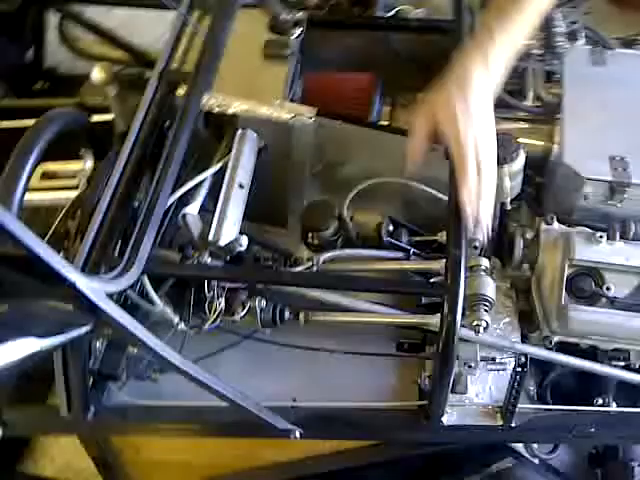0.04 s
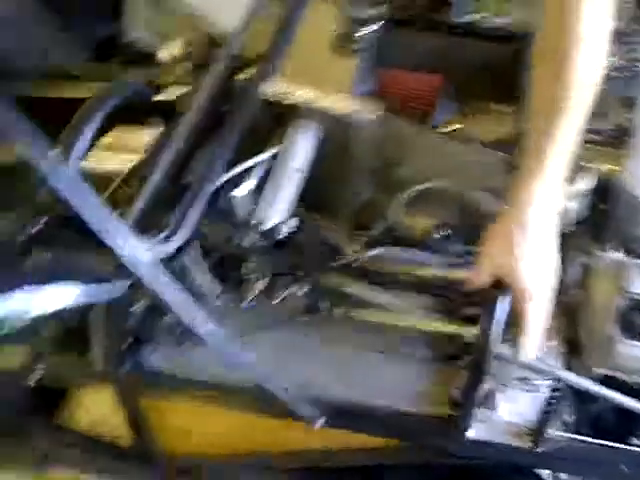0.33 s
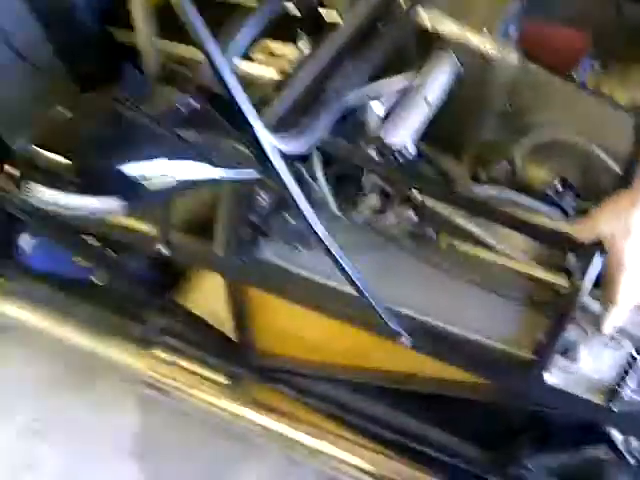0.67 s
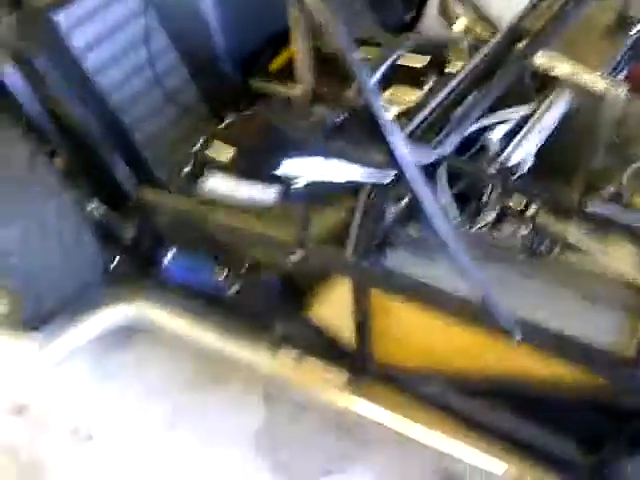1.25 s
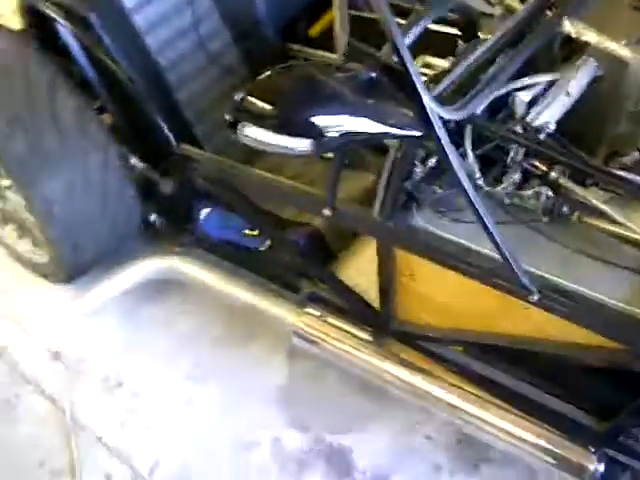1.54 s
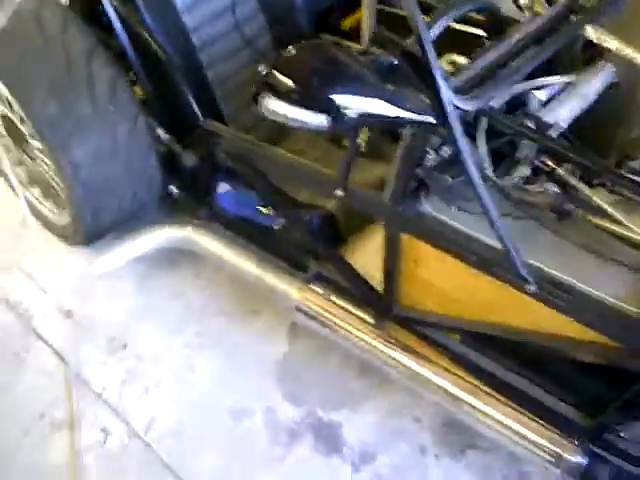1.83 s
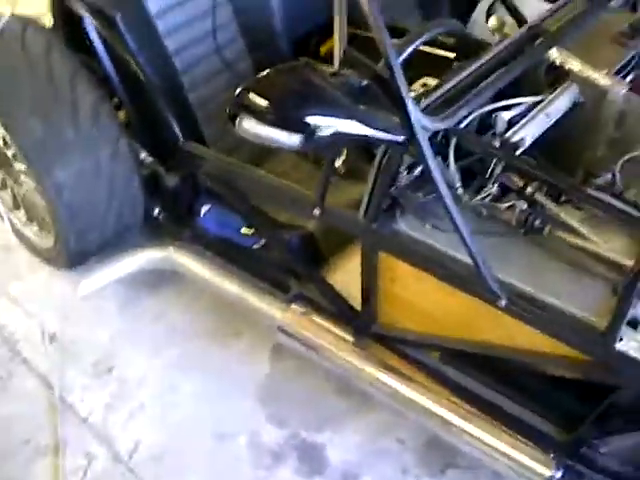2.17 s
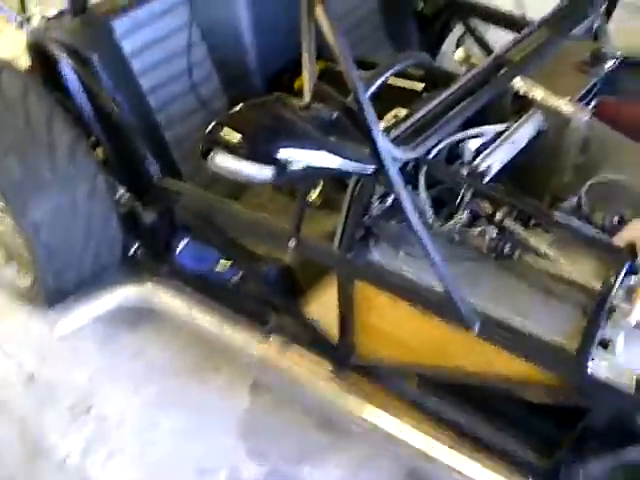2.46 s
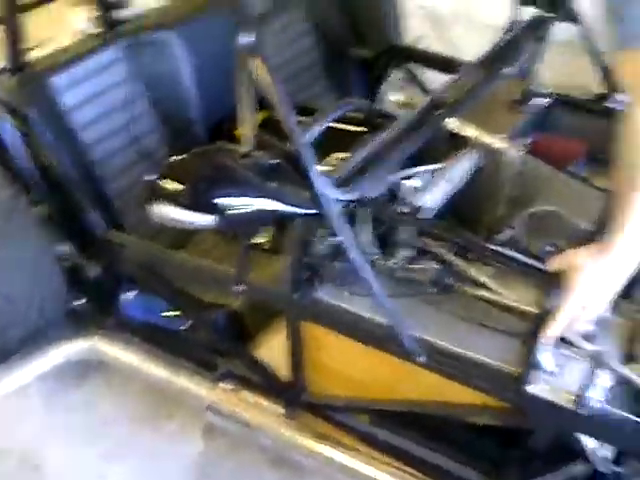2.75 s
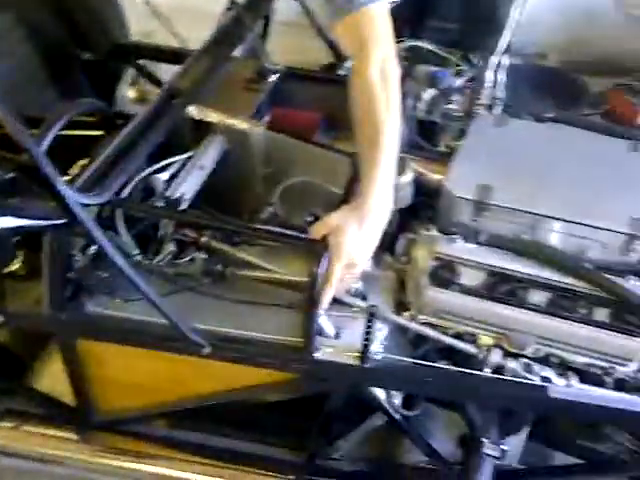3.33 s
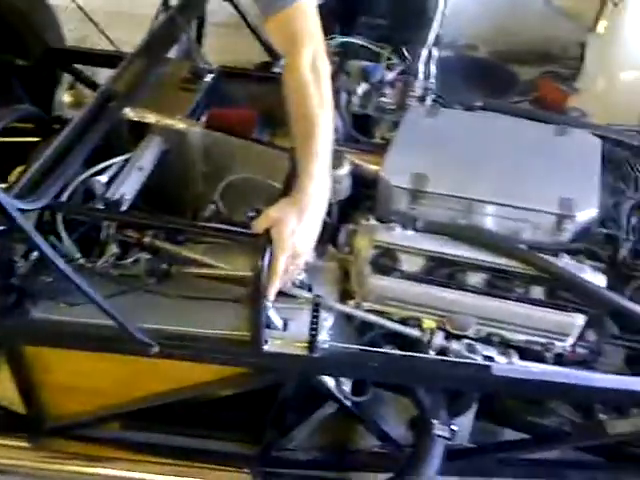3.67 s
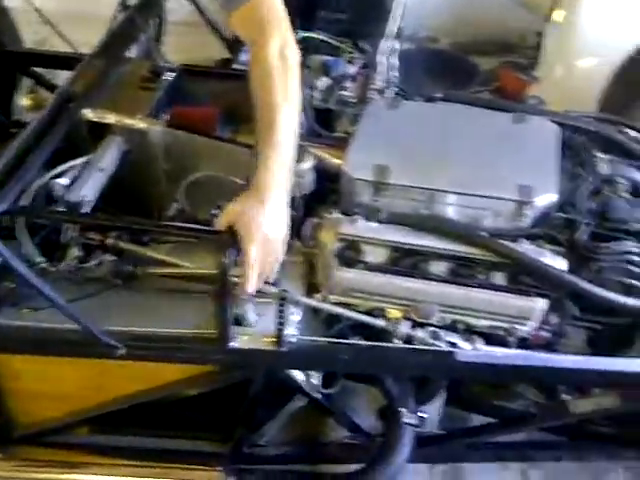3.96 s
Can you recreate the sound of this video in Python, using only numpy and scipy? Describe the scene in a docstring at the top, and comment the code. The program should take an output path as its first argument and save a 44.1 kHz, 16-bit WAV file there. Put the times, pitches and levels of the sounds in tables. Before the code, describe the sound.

An uncovered car engine sinks and surges on the throttle, booming, rasping and popping.

```python
"""In a garage, an uncovered four-cylinder engine runs while a hand works its throttle.
Each firing is a pressure pulse. As the revs sink, the uneven pulse train excites the exhaust's
resonances and booms; on the throttle it barks and rasps, with a few sharp pops of unburnt fuel.
Valve gear and belts tick and hiss underneath, and reflections from the close walls smear the pulses."""
import sys
import numpy as np
from scipy import signal
from scipy.fft import rfft, irfft
from scipy.io import wavfile
from scipy.ndimage import uniform_filter1d

SR = 44100
rng = np.random.default_rng(int(sys.argv[2]) if len(sys.argv) > 2 else 0)


def wav_out(sig):
    """Save sig, one row per channel (or a flat mono array), as 16-bit PCM at SR to the path in sys.argv[1]."""
    wavfile.write(sys.argv[1], SR, np.round(np.clip(np.atleast_2d(sig).T, -1, 1) * 32767).astype(np.int16))


N = 176400
TIME = np.arange(N) / SR


def from_db(db):
    """Amplitude ratio of a level: a factor of ten per 20 dB."""
    return 10 ** (np.asarray(db) / 20)


def rms_one(x):
    """Normalisation to unit mean power."""
    return x / np.sqrt(np.mean(x ** 2) + 1e-20)


def in_time(rows):
    """Linear interpolation of each column after the time column, at every sample."""
    times, *columns = np.transpose(rows)
    return [np.interp(TIME, times, column) for column in columns]


def evened(x, span_s):
    """Division by the running RMS: unit level over the span, while faster flutter stays."""
    size = max(int(span_s * SR), 2)
    power = uniform_filter1d(uniform_filter1d(x * x, size), size)
    return x / np.sqrt(np.abs(power) + 1e-12)


def coloured(x, spectrum, size=4096):
    """Minimum-phase filtering: folding the cepstrum gives the spectrum a causal response."""
    hz, db = np.transpose(spectrum)
    grid_hz = np.maximum(np.arange(size // 2 + 1) * SR / size, 1)
    gain = from_db(np.interp(np.log(grid_hz), np.log(hz), db))
    cepstrum = irfft(np.log(gain))
    cepstrum[1:size // 2] *= 2
    cepstrum[size // 2 + 1:] = 0
    response = irfft(np.exp(rfft(cepstrum)))
    return signal.fftconvolve(x, response)[:N]


def resonance(x, hz, width_hz):
    """A damped oscillator driven by x, with unit gain at resonance."""
    radius = np.exp(-np.pi * width_hz / SR)
    feedback = [1, -2 * radius * np.cos(2 * np.pi * hz / SR), radius ** 2]
    return signal.lfilter(np.array([1, 0, -1]) * (1 - radius ** 2) / 2, feedback, x + 1e-18)


def band_pass(x, low_hz, high_hz):
    """Butterworth filtering: a flat band with sloping skirts."""
    return signal.sosfilt(signal.butter(3, [low_hz, high_hz], "band", fs=SR, output="sos"), x)


def dying(clicks, decay_s):
    """Exponential relaxation: each impulse decays from its own height."""
    return signal.lfilter([1], [1, -np.exp(-1 / (decay_s * SR))], clicks + 1e-18)


def clicks_at(times, gains):
    """An impulse train; coincident impulses add."""
    return np.bincount(np.clip(times * SR, 0, N).astype(int), gains, N + 1)[:N]


def noise():
    """White noise: equal mean power per hertz."""
    return rng.standard_normal(N)


def garage(x, wet_db, positions=7, t60_s=0.26, wall_delay_s=0.003):
    """Reverberation: direct sound plus wall reflections whose pattern changes as the listener moves."""
    t = TIME[:SR // 3]
    reflections = 0
    for k in range(positions):
        distance = np.abs(TIME / TIME[-1] * (positions - 1) - k)
        crossfade = np.sqrt(np.maximum(1 - distance, 0))
        tail = rng.standard_normal(len(t)) * from_db(-60 * t / t60_s) * (t > wall_delay_s)
        reflections += signal.oaconvolve(x * crossfade, tail / np.linalg.norm(tail))[:N]
    return x + from_db(wet_db) * reflections


def rumble():
    """Band-limited noise: a faint, steady rumble near 100 Hz."""
    # rumble spectrum: (frequency [Hz], relative level [dB])
    spectrum = [(20, -26), (60, -5), (100, 38.5), (160, 19.5), (300, -53)]
    return from_db(-47) * rms_one(coloured(noise(), spectrum))


def valve_gear(fired):
    """Amplitude-modulated noise: belts and valves hiss, ticking lightly in step with the firings."""
    # mechanical hiss spectrum: (frequency [Hz], relative level [dB])
    spectrum = [(900, -11), (2000, -2.5), (2900, -4), (3350, -2), (3750, -5.5), (4500, -1.5), (5500, -4),
                (6000, -11.5), (7000, -11.5), (7800, -24.5), (8700, -33)]
    # hiss envelope: (time [s], relative level [dB])
    envelope = [(0.23, -28.5), (1.15, -34), (1.26, -28), (1.44, -37.5), (1.84, -34.5), (1.85, -32),
                (1.94, -36), (2.02, -30.5), (2.29, -37), (3.02, -32.5), (3.03, -30.5), (3.1, -31.5),
                (3.21, -26.5), (3.36, -37.5), (3.39, -27), (3.62, -32.5), (3.65, -23.5), (3.76, -31.5),
                (3.77, -26.5), (3.88, -35), (3.89, -24.5), (4.0, -30)]
    hiss_db, = in_time(envelope)
    ticking = rms_one(noise() * dying(fired, decay_s=0.0037))
    hiss = garage(coloured(noise() + from_db(-7.5) * ticking, spectrum), wet_db=-17.5)
    return from_db(hiss_db + 2.5) * evened(hiss, span_s=0.12)


def rings(fade_s=0.042):
    """Narrow resonances, driven by noise, each sing for a while over the engine."""
    # ringing modes: (start [s], end [s], frequency [Hz], bandwidth [Hz], level [dB])
    modes = [(.2, 0.384, 316.5, 5, -28), (0.792, 1.004, 321, 13, -31), (.8, 0.982, 219.5, 5.5, -19),
             (1.31, 1.701, 253, 8.9, -23), (1.34, 1.677, 439, 11, -23), (1.35, 1.9, 522, 16.2, -25.5),
             (.2, .6, 991, 37, -31.5), (0.897, 1.4, 1002, 36, -38.5), (1.814, 2.198, 1166, 10, -31.5),
             (2.954, 3.998, 1149, 6.4, -32), (2.648, 2.9, 3380, 150, -40.5), (3.108, 4, 397.3, 5.2, -25.5)]
    ringing = 0
    for start, end, hz, width, db in modes:
        gate = np.clip(np.minimum(TIME - start, end - TIME) / fade_s + 1, 0, 1)
        ringing += from_db(db) * gate * evened(resonance(noise(), hz, width), span_s=0.35)
    return ringing


def hum(cycles, levels_db):
    """Harmonics of the cycle rate, the engine orders, swell and fade as they glide through resonances."""
    # engine orders: (multiple of the cycle rate [1], level trim [dB])
    orders = [(2, -0.5), (3, -2), (5, 0.5), (8, -5), (10, -2.5)]
    tone = 0
    for (order, trim_db), level_db in zip(orders, levels_db):
        phase = 2 * np.pi * (order * cycles + rng.random())
        tone += from_db(trim_db + level_db) * np.sqrt(2) * np.sin(phase)
    return tone


def pops():
    """Sudden combustion of unburnt fuel in the exhaust: a snap, a dying crack and a low push of air."""
    # exhaust pops: (time [s], crack level [dB], thump level [dB])
    events = [(1.651, -23.5, -30), (1.846, -16, -19), (2.011, -19.5, -39), (3.030, -15, -32),
              (3.174, -22, -37), (3.388, -20.5, -40), (3.461, -18, -19.5), (3.641, -13.5, -14),
              (3.768, -20.5, -47), (3.893, -19.5, -38)]
    # spectra of the crack and the thump: (frequency [Hz], relative level [dB])
    crack_spectrum = [(150, -26), (350, 0), (800, 13.5), (1500, -3.5), (3200, -0.5), (5500, -11),
                      (7200, -9.5), (8700, -71.5)]
    thump_spectrum = [(10, -10), (25, -17), (50, -10), (90, -11.5), (180, -3.5), (400, -29), (1500, -69.5)]
    times, crack_db, thump_db = np.transpose(events)
    blows = clicks_at(times, from_db(crack_db))
    snap = from_db(3.5) * dying(blows, decay_s=0.0026)
    crack = rms_one(coloured(noise(), crack_spectrum)) * (dying(blows, decay_s=0.02) + snap)
    thump = coloured(clicks_at(times, from_db(thump_db)), thump_spectrum, size=16384)
    thump *= from_db(thump_db.max()) / np.abs(thump).max()
    return garage(crack, wet_db=-9) + thump


def coughs():
    """Impulse response: a hard firing is one blunt pressure pulse that sets the pipe ringing."""
    # hard firings of the stumbling engine: (time [s], level [dB])
    events = [(0.923, -18), (0.928, -16), (1.103, -14.5), (1.322, -9.5), (1.350, -18), (1.369, -10),
              (1.409, -6.5), (1.423, -2), (1.733, -10), (2.525, -15.5), (2.700, -11), (2.770, -13),
              (2.832, -4.5), (2.878, -4), (2.910, -2.5)]
    # modes they excite: (frequency [Hz], bandwidth [Hz], relative level [dB])
    modes = [(260, 34, -4), (312, 41, 17.5), (442, 49, 11), (643, 80, 6), (850, 230, -17.5),
             (1260, 290, -28.5)]
    times, db = np.transpose(events)
    pulses = band_pass(clicks_at(times, from_db(db)) + 1e-18, low_hz=170, high_hz=1420)
    ringing = pipe(pulses, modes)
    return garage(ringing * from_db(db.max()) / np.abs(ringing).max(), wet_db=-12)


def pipe(pressure, modes):
    """Modal superposition: the pipe's response is the sum of its resonances."""
    return sum(from_db(db) * resonance(pressure, hz, width) for hz, width, db in modes)


def firings(cycles, cylinders=4, jitter_s=0.0002, uneven_db=3):
    """A quasi-periodic impulse train: each cylinder fires once a cycle, and no two firings are alike."""
    # strength of each cylinder in firing order: (relative level [dB])
    cylinder_db = [2, -1, -2, -4]
    index = np.arange(int(cycles[-1] * cylinders))
    timing_scatter, level_scatter = rng.standard_normal((len(index), 2)).T
    times = np.interp(index / cylinders, cycles, TIME) + jitter_s * timing_scatter
    db = np.take(cylinder_db, index % cylinders) + uneven_db * np.minimum(level_scatter, 2)
    return clicks_at(times, from_db(db))


def puffs(fired, turbulence_db, decay_s):
    """Turbulence: each firing's pressure pulse is followed by a decaying puff of noisy gas."""
    return rms_one(fired) + from_db(turbulence_db) * rms_one(noise() * dying(fired, decay_s))


def bark_and_rasp(fired, hardening=0.42, full_throttle_db=-17):
    """Pulses against flow noise: an open throttle hardens them to a bark and rasp; closed, gas rushes."""
    # throttle, as heard: (time [s], bark level [dB], rasp level [dB])
    throttle = [(0.23, -28.5, -35), (0.28, -26.5, -33), (0.66, -30, -36), (1.13, -31.5, -31),
                (1.26, -29, -32), (1.34, -22.5, -25.5), (1.39, -23.5, -33), (1.42, -18.5, -38),
                (1.44, -21, -34), (1.6, -27.5, -30), (1.63, -18, -33), (1.69, -21.5, -26.5),
                (1.7, -23.5, -34), (1.78, -16, -25.5), (1.81, -26, -29), (1.83, -10.5, -30),
                (1.84, -20.5, -31), (1.85, -16.5, -22), (1.98, -20, -28), (2.01, -16.5, -21),
                (2.21, -20.5, -27.5), (2.25, -27.5, -33), (2.69, -32.5, -42.5), (2.71, -24, -33),
                (2.74, -34.5, -33), (2.78, -26, -29), (2.8, -28.5, -36), (2.88, -16, -20.5),
                (2.96, -23.5, -30.5), (3.01, -17.5, -22), (3.2, -18.5, -25.5), (3.21, -17, -18),
                (3.33, -18.5, -24.5), (3.38, -26.5, -33), (3.39, -25, -23), (3.43, -14, -21),
                (3.48, -23.5, -20), (3.55, -24.5, -30), (3.6, -19.5, -22), (3.63, -23, -26),
                (3.64, -19, -24), (3.7, -18, -23), (3.75, -26.5, -29), (3.78, -23.5, -21.5),
                (3.83, -20, -28), (3.86, -28, -30), (3.89, -23.5, -25), (4.0, -17, -23.5)]
    # spectra of the midrange bark and the higher rasp: (frequency [Hz], relative level [dB])
    bark_spectrum = [(200, -27), (380, -6), (440, -0.5), (480, -5), (522, -1.5), (600, -3), (680, 3.5),
                     (720, -4.5), (760, -0.5), (860, -4), (1050, -7.5), (1400, -12.5), (1900, -19),
                     (4000, -58.5)]
    rasp_spectrum = [(700, -17.5), (1300, 1.5), (1600, 0), (2200, 2), (2700, -3), (3250, 2), (3800, -13.5),
                     (5500, -7.5), (8500, -38)]
    bark_db, rasp_db = in_time(throttle)
    hardness = from_db(hardening * (bark_db - full_throttle_db))
    bark_gas = hardness * puffs(fired, turbulence_db=5.5, decay_s=0.0015) + from_db(-3.5) * noise()
    bark = garage(coloured(bark_gas, bark_spectrum), wet_db=1.5)
    rasp_gas = hardness * puffs(fired, turbulence_db=15.5, decay_s=0.002) + from_db(-1) * noise()
    rasp = garage(coloured(rasp_gas, rasp_spectrum), wet_db=5.5)
    return (from_db(bark_db + 0.5) * evened(bark, span_s=0.033)
            + from_db(rasp_db - 2.5) * evened(rasp, span_s=0.02))


def boom(fired):
    """Forced resonance: the firings drive the low modes of the exhaust and the garage."""
    # lower and upper modes: (frequency [Hz], bandwidth [Hz], relative level [dB])
    low_modes = [(126.7, 13, -10.5), (185.5, 16, -8.5), (222.7, 39, -0.5), (244.9, 6.7, -6)]
    high_modes = [(321.5, 8.7, 2.5), (366.4, 29, -2), (409, 18, -12), (458.4, 30, -15)]
    # boom envelope: (time [s], lower modes' level [dB], upper modes' level [dB])
    envelope = [(0.23, -24, -16.5), (0.27, -23, -17.5), (0.36, -20, -16), (0.39, -22, -26),
                (0.42, -22.5, -13.5), (0.51, -23, -21), (0.58, -18.5, -18.5), (0.65, -24.5, -15),
                (0.71, -19, -22.5), (0.82, -20.5, -23.5), (0.84, -18.5, -18), (1.05, -20.5, -17.5),
                (1.08, -22.5, -29.5), (1.11, -10, -15.5), (1.14, -24, -23), (1.17, -20, -18),
                (1.21, -22.5, -23), (1.36, -14, -13.5), (1.39, -18, -24), (1.42, -23.5, -24.5),
                (1.51, -20, -18), (1.53, -29, -26), (1.65, -18, -14.5), (1.69, -25, -23.5),
                (1.85, -19, -16.5), (1.9, -35, -31), (1.94, -21.5, -23), (2.21, -28.5, -17.5),
                (2.25, -21, -27), (2.29, -31, -27), (2.82, -23, -18.5), (2.85, -21.5, -16),
                (3.09, -23.5, -18.5), (3.26, -28.5, -18.5), (3.32, -34, -17.5), (3.37, -32, -30),
                (3.39, -26.5, -17.5), (3.8, -30, -21.5), (3.99, -22, -19), (4.0, -23, -27)]
    low_db, high_db = in_time(envelope)
    gas = puffs(fired, turbulence_db=7, decay_s=0.0048)
    low = band_pass(pipe(gas, low_modes), low_hz=127, high_hz=331.5)
    high = band_pass(pipe(gas, high_modes), low_hz=270, high_hz=637)
    return (from_db(low_db - 0.5) * evened(low, span_s=0.033)
            + from_db(high_db - 1.5) * evened(high, span_s=0.033))


def scene():
    """Superposition beside the car: engine speed, integrated to phase, times the firings and the hum."""
    # engine speed and hum: (time [s], four-stroke cycle rate [Hz], levels of orders 2, 3, 5, 8, 10 [dB])
    revs = [(0.2, 42, -35, -37, -29, -12, -36), (0.3, 40.8, -39.5, -19.5, -30, -13.5, -37),
            (0.38, 38.1, -46, -31.5, -24, -44, -22), (0.66, 30.94, -40.5, -43, -46, -32, -15),
            (0.71, 30.4, -41, -42, -35, -36, -30), (0.89, 27.37, -62, -52, -46, -15.5, -43.5),
            (0.99, 25.98, -59, -41, -32, -23, -26.5), (1.14, 24.16, -40, -68, -35, -26, -22.5),
            (1.31, 23.72, -50, -44, -35, -11, -38), (1.34, 24.71, -48, -37, -33, -28.5, -33),
            (1.46, 30.53, -49, -37, -24.5, -21, -24), (1.62, 36.35, -56, -32.5, -33, -32, -30),
            (1.91, 34.72, -52, -54, -32.5, -44, -22.5), (2.0, 33.78, -50, -39, -39, -22, -24),
            (2.19, 36.43, -57, -48, -19.5, -43, -23), (2.29, 35.44, -66, -40.5, -33.5, -52, -22.5),
            (2.75, 26.3, -66, -46, -36, -44, -33.5), (2.91, 28.49, -55, -57, -33, -43, -37),
            (3.0, 31.9, -52, -42.5, -39, -42, -28), (3.17, 36.87, -55, -34, -21, -29, -29),
            (3.29, 39.23, -62, -42, -34, -19, -33), (3.53, 43.29, -59, -45, -43, -51, -35),
            (3.64, 43.71, -44, -26.5, -31, -30, -30), (3.67, 43.98, -43, -55, -30, -33, -32),
            (3.77, 44.38, -65, -38.5, -51, -33, -49), (4.0, 45.64, -49, -42, -23.5, -26, -28)]
    cycle_hz, *orders_db = in_time(revs)
    cycles = np.cumsum(cycle_hz) / SR
    fired = firings(cycles)
    background = rumble()
    engine = boom(fired) + hum(cycles, orders_db) + bark_and_rasp(fired) + valve_gear(fired)
    return (background + engine + rings() + coughs() + pops())[None]


def record(dry, start_s=0.1945, attack_s=0.003, surge_db=10.5, surge_s=0.019, ceiling=0.58):
    """The sound cuts in with a brief surge; saturation rounds the peaks and a low-pass cuts the top."""
    elapsed = np.maximum(TIME - start_s, 0)
    onset = np.minimum(elapsed / attack_s, 1)
    surge = from_db(surge_db * np.exp(-(elapsed / surge_s) ** 2))
    x = dry * onset * surge
    rounded = x / (1 + (x / ceiling) ** 4) ** 0.25
    low_pass = signal.cheby2(16, 60, 9200, fs=SR, output="sos")   # 60 dB down from 9200 Hz
    return signal.sosfilt(low_pass, rounded)


dry = scene()
out = record(dry)
wav_out(out)
```